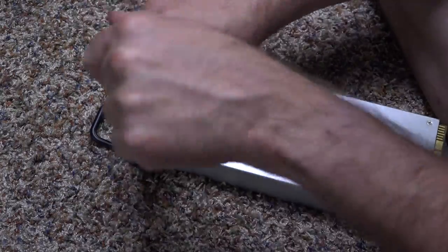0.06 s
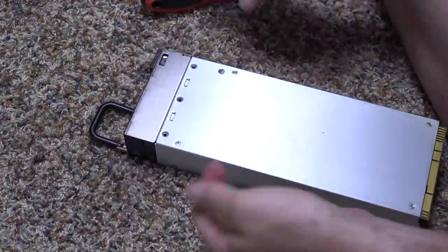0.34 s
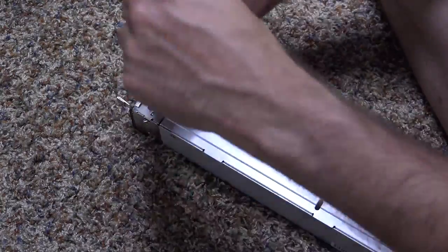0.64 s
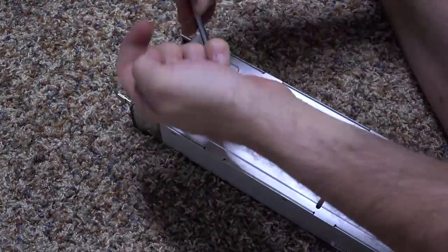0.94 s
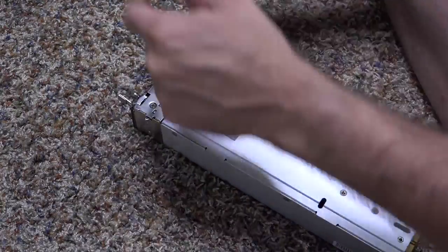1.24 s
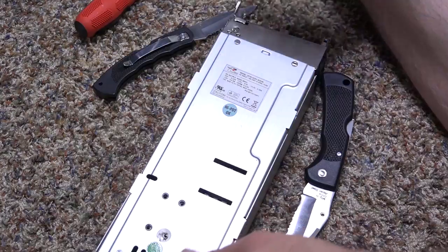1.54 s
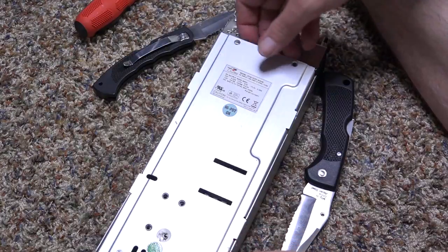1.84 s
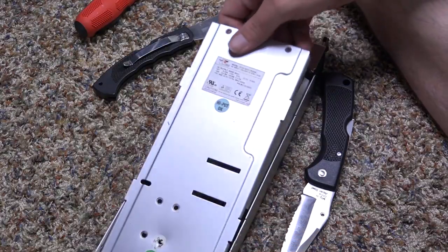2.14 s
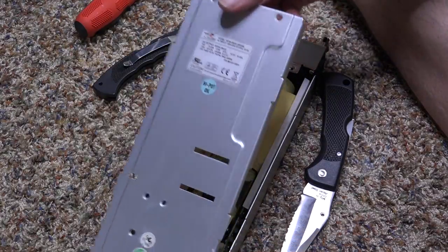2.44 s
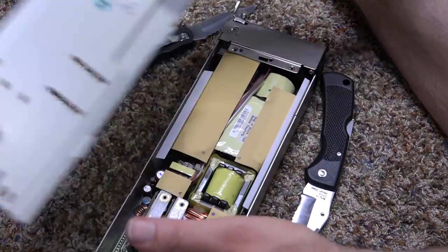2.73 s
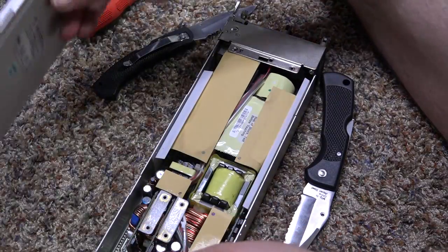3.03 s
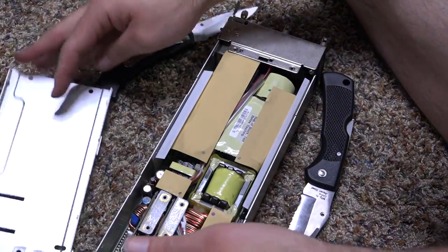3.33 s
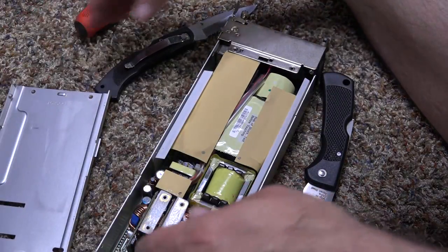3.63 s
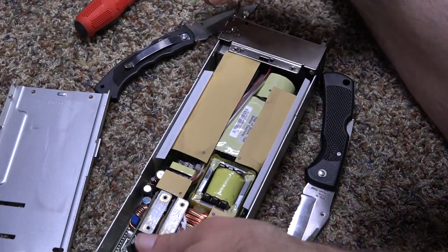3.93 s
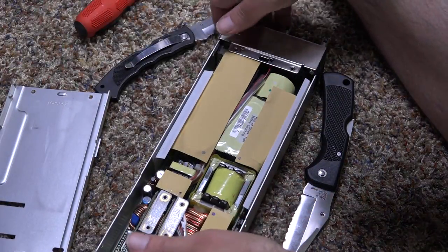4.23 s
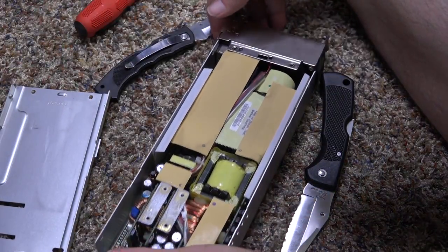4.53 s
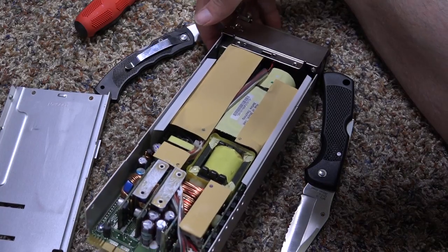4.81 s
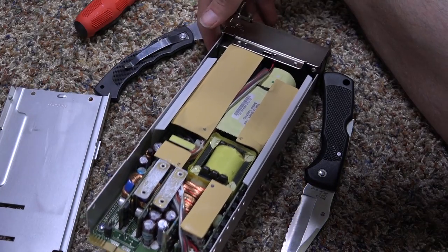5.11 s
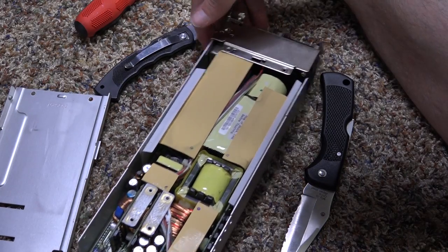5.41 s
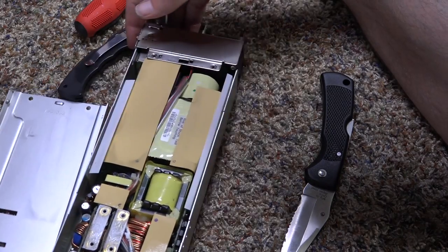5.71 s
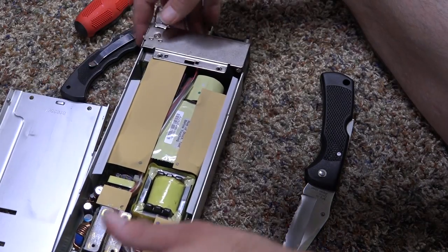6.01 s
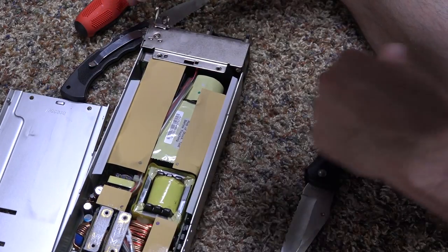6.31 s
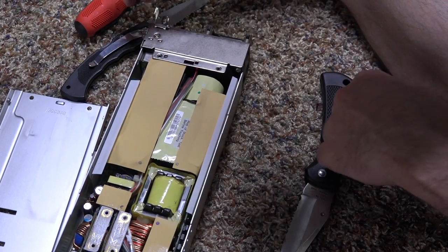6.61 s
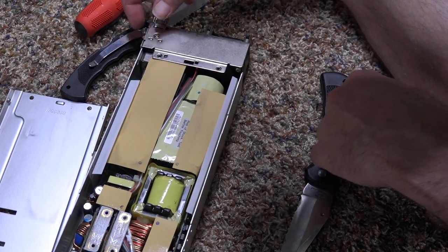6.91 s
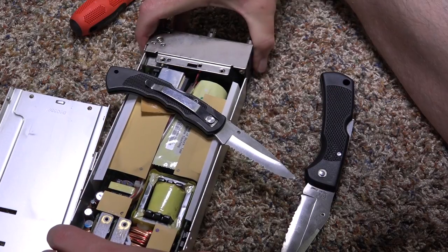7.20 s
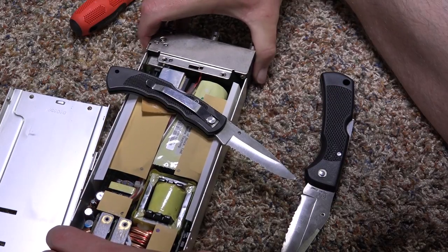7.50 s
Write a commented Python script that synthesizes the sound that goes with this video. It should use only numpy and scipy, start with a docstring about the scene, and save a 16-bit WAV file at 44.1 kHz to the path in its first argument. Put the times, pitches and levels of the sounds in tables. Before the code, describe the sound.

For the first 1.5 seconds, sped-up screwdriver work makes sharp, high, irregular ticks and tiny scratches over a faint beating whistle and hiss. This cuts abruptly to a soft, low room hum that lasts to the end. From about 2 to 2.5 seconds, a sheet-metal cover scrapes off its case, catching with short squeaks and faint tings. After a soft carpet scuff, the cover lands at 3.4 seconds with a loud, bright clatter, buzzing briefly on its edge and ringing out. Light clicks and knocks of handling come around 3.9 to 4.1 seconds and again at 5.1. From 5.5 to about 6.1 seconds the case brushes softly over carpet, bumping the cover into a quieter ringing rattle near 5.7. Two small clicks sound near 6.9 seconds, then dull knocks at 7 and 7.5. Everything is close and fairly dry, in a quiet room.

```python
"""Opening a small metal case

On a carpet in a quiet, humming room, the first second and a half runs at ten times the speed:
the hum is a beating whistle, the screwdriver mere ticks. Then, at normal speed, the sheet-metal
cover scrapes off in squeaking stick-slip and clatters down, ringing. The case is pushed across
the carpet against it, and nudged tools click and knock."""
import sys
import numpy as np
from scipy import signal
from scipy.fft import rfft, irfft
from scipy.io import wavfile
from scipy.ndimage import uniform_filter1d

SR = 44100
rng = np.random.default_rng(int(sys.argv[2]) if len(sys.argv) > 2 else 0)


def bounce(signal):
    """Save signal as a 16-bit WAV file at the path given by the first command-line argument."""
    frames = np.transpose(np.atleast_2d(signal))
    limited = np.clip(frames, -1, 1)
    pcm = np.round(limited * 32767).astype(np.int16)
    wavfile.write(sys.argv[1], SR, pcm)


N = 333043
T = np.arange(N) / SR


def amp(db):
    """Decibels to gain."""
    return 10 ** (np.asarray(db) / 20)


def unit_rms(x):
    """Scales to rms 1."""
    return x / np.sqrt(np.mean(x ** 2) + 1e-20)


def curve_at(points, hz):
    """Reads a curve on a log-frequency axis."""
    freqs, values = np.transpose(points)
    return np.interp(np.log(hz + 1), np.log(freqs), values)


def add(mix, start_s, sound):
    """Mixes a sound in at start_s."""
    part = mix[round(start_s * SR):][:len(sound)]
    part += sound[:len(part)]


def held(start_s, end_s, rise_s, fall_s):
    """Attack, hold, release: 20 dB down at rise_s before the start and fall_s after the end."""
    return amp(-20 * (np.maximum(start_s - T, 0) / rise_s + np.maximum(T - end_s, 0) / fall_s))


def swell(peak_s, half_s):
    """A bell-shaped rise and fall around peak_s."""
    return np.exp(-np.minimum(((T - peak_s) / half_s) ** 2, 20))


def coloured(x, colour):
    """Shapes x with an EQ curve of (freq_hz, gain_db) points, at rms 1."""
    gain = amp(curve_at(colour, np.fft.rfftfreq(len(x), 1 / SR)))
    return unit_rms(irfft(rfft(x) * gain, len(x)))


def burst(colour, t60, ring_hz=1000, ring_db=0, octaves=.2, size=8192):
    """A contact sets many damped modes going; the cluster at ring_hz stands out by ring_db."""
    hz, t = np.fft.rfftfreq(size, 1 / SR), np.arange(size) / SR
    shape_db = curve_at(colour, hz) + ring_db * np.exp(-(np.log2((hz + 1) / ring_hz) / octaves) ** 2)
    noise = irfft(amp(shape_db) * np.exp(2j * np.pi * rng.random(len(hz))))
    fade = amp(-60 * t / t60) * (1 - np.exp(-t / 0.0002))
    return unit_rms(noise * fade) * np.sqrt(np.mean(fade ** 2))


def ring(modes, tilt_db=0, spread_db=2.5, damping=1):
    """Struck modes die away from about rms 1; each strike point weights them anew."""
    hz, db, t60 = np.transpose(modes)[:, :, None]
    t = np.arange(SR // 2) / SR
    weight = amp(db + tilt_db * np.log2(hz / 4000) + spread_db * rng.standard_normal(hz.shape))
    waves = np.sin(2 * np.pi * (hz * t + rng.random(hz.shape))) * amp(-60 * t * damping / t60)
    attack = 1 - np.exp(-t / .0004)
    return (weight * waves).sum(0) / np.sqrt(np.sum(weight ** 2) / 2) * attack


def resonate(drive, modes):
    """Lets a steady drive ring a set of modes, at rms 1."""
    return unit_rms(signal.oaconvolve(drive, ring(modes))[:N])


def slips(per_s, spread_db):
    """Tiny stick-slip impacts at random times; spread_db makes their sizes uneven."""
    size = amp(spread_db * np.minimum(rng.exponential(1, N), 4))
    return size * rng.choice([-1, 1], N) * (rng.random(N) < per_s / SR)


def air_and_hum(air, hum, air_db):
    """A steady bed of air noise with humming sine tones."""
    tones = sum(amp(db) * np.sqrt(2) * np.sin(2 * np.pi * (hz * T + rng.random())) for hz, db in hum)
    return amp(air_db) * coloured(rng.standard_normal(N), air) + tones


def room_tone():
    """Soft air, mains hum and a motor turning just below the mains pitch."""
    air = [(25, -15.5), (60, -4.5), (115, -2), (190, -10), (255, -5.5), (400, -13.5), (600, -13.5),
           (1000, -18), (1800, -24.5), (3200, -33), (6000, -35.5), (15500, -37)]  # colour of the room air: freq_hz, gain_db
    hum = [(117.9, -66), (120, -68), (234.3, -76), (258.3, -73), (479.1, -66)]  # mains and motor tones: pitch_hz, level_db
    return air_and_hum(air, hum, air_db=-56)


def fast_room_tone():
    """At ten times the speed, mains and motor beat together as a whistle."""
    air = [(80, -71), (150, -34.5), (200, -32), (300, -22), (360, -12), (470, -18), (750, -9.5),
           (1000, -15), (1350, -12.5), (1800, -18), (4800, -20.5), (8000, -24), (15500, -31.5)]  # colour of the sped-up air: freq_hz, gain_db
    hum = [(1179, -56), (1200, -58), (2342, -69.5), (2584, -73), (4791, -65.5), (7413, -77), (12274, -77)]  # sped-up hum with the motor's high partials: pitch_hz, level_db
    return air_and_hum(air, hum, air_db=-56.5)


def room_reverb(x):
    """A short, carpeted tail of sparse reflections."""
    decay = [(150, 0.4), (1000, 0.17), (5000, 0.13), (15000, 0.092)]  # the room's decay: freq_hz, t60_s
    size = SR // 2
    reflections = rng.choice([-1., 1.], size) * (rng.random(size) < .07) * (T[:size] > .005)
    hz, t, spectra = signal.stft(reflections, SR, nperseg=256)
    fade = amp(-60 * t / curve_at(decay, hz)[:, None])
    tail = signal.istft(spectra * fade, SR, nperseg=256)[1]
    return signal.oaconvolve(x, tail / np.linalg.norm(tail))[:N]


def carpet_rub():
    """Carpet fibres slip under the metal in one long push and a few scuffs."""
    colour = [(150, 2), (500, 1.5), (1000, -2.5), (2500, -14.5), (6000, -9), (9000, -15), (15000, -10.5)]  # metal on carpet: freq_hz, gain_db
    scuffs = [(3.264, .028, -51), (3.33, .07, -58.5), (5.94, .03, -56.5), (6.017, 0.047, -60),
              (6.109, 0.029, -55), (7.2, 0.045, -62)]  # scuffs of cover and case: peak_s, half_length_s, level_db
    push = amp(-56) * held(5.52, 5.83, rise_s=0.13, fall_s=0.43)
    power = push ** 2 + sum((amp(db) * swell(peak_s, half_s)) ** 2 for peak_s, half_s, db in scuffs)
    return np.sqrt(power) * coloured(slips(per_s=4200, spread_db=2.5), colour)


def handling():
    """Small clicks and dull knocks on the case; the longer the click, the longer the steel rings."""
    # touches and bumps: start_s, click_db, click_hz, click_t60_s, knock_db
    touches = [(3.8746, -40, 10600, 0.03, -56), (3.884, -47, 5950, 0.034, -70),
               (3.9554, -55.5, 6000, 0.032, -57.5), (3.9744, -57, 5040, 0.034, -52),
               (4.0933, -38, 6700, 0.04, -44.5), (4.733, -55.5, 5950, 0.059, -68.5),
               (5.122, -41.5, 5000, 0.078, -43), (5.653, -49, 1755, 0.19, -44),
               (6.8718, -34, 11500, 0.029, -68), (6.885, -38, 5400, 0.023, -57),
               (7.0478, -41.5, 3000, 0.032, -34.5), (7.4979, -41.5, 3730, 0.018, -38.5)]
    knock = [(120, -23), (340, 2.5), (520, -6.5), (860, 2.5), (1200, -17), (2000, -9), (3500, -18),
             (8000, -48.5)]  # the case's dull knock: freq_hz, gain_db
    case_modes = [(3095, 2, 0.079), (3960, -3, 0.084), (4600, -13, 0.1), (5940, -9, 0.11),
                  (7450, -14, 0.13), (8958, -21, 0.19), (10120, -15, 0.15)]  # the steel case's ring: pitch_hz, weight_db, base_t60_s
    out = np.zeros(N)
    for start_s, click_db, hz, t60, knock_db in touches:
        # each click is strongest around its own pitch
        click = [(400, -18), (1500, -6), (hz, 0), (hz * 1.6, -4), (hz * 3, -17)]
        add(out, start_s, amp(click_db) * burst(click, t60, ring_hz=hz, ring_db=7.5, octaves=0.093))
        add(out, start_s, amp(knock_db) * burst(knock, t60=0.05))
        add(out, start_s, amp(min(click_db, knock_db) - 12) * ring(case_modes, damping=0.061 / t60))
    return out


def fast_screwdriver():
    """Unscrewing at high speed: every clink shrinks to a high tick with no bass."""
    ticks = [(0.0223, -18, 5560), (0.0281, -14.5, 5200), (0.034, -31, 5760), (0.0894, -19, 5300),
             (0.217, -32, 7000), (0.267, -31, 6470), (0.305, -33, 6500), (.312, -33.5, 9500),
             (.469, -27.5, 3830), (.6638, -21, 5750), (.6823, -29, 4100), (0.6896, -28, 4150),
             (0.96, -21.5, 7200), (0.965, -30.5, 5960), (1.036, -20, 12300), (1.322, -32, 5600),
             (1.3335, -29, 11400)]  # clinks of screwdriver and screws: start_s, level_db, ring_hz
    scratches = [(.274, -43), (.479, -37), (.835, -47), (.876, -44), (1.2835, -41)]  # the blade scratching in the screw heads: start_s, level_db
    colour = [(1000, -41), (2200, -22), (3400, -3.5), (7000, -0.5), (15500, -6)]
    out, tick_t60_s = np.zeros(N), 0.0072
    for start_s, db, hz in ticks:
        add(out, start_s, amp(db) * burst(colour, tick_t60_s, ring_hz=hz, ring_db=9, octaves=0.22))
        add(out, start_s, amp(db - 26) * burst(colour, t60=0.027))  # the room's tail, shrunk as well
    for start_s, db in scratches:
        add(out, start_s, amp(db) * burst(colour, t60=0.034, ring_hz=6600, ring_db=6, octaves=0.3))
    faint_ticks = signal.oaconvolve(slips(per_s=30, spread_db=4), burst(colour, tick_t60_s))[:N]
    out += amp(-67.5) * unit_rms(faint_ticks)
    return signal.sosfilt(signal.butter(2, 1200, "high", fs=SR, output="sos"), out)


def sheet_modes(t60, count=320):
    """The crowd of close modes of a thin sheet; the high ones die sooner."""
    shimmer = [(1400, -1.5), (2500, -10), (5000, 2), (7000, 2), (9000, -3.5), (12000, 6.5), (15500, -6.5)]  # colour of the cover's weaker modes: freq_hz, gain_db
    hz = 1400 + 14400 * (np.arange(count) + rng.random(count)) / count
    decay_s = t60 * (hz / 4000) ** -.25 * rng.uniform(.6, 1.4, count)
    return np.c_[hz, curve_at(shimmer, hz), decay_s]


def edge_tings():
    """Single high modes ring out as the cover's edge slips free."""
    tings = [(2.335, 5950, -50), (2.42, 6880, -37), (2.495, 2950, -49.5), (2.497, 7480, -54)]  # the freed edge singing: start_s, pitch_hz, level_db
    rise_s, t60_s = 0.0051, .11
    out, t = np.zeros(N), T[:SR // 2]
    envelope = (1 - np.exp(-t / rise_s)) * amp(-60 * t / t60_s)
    for start_s, hz, db in tings:
        add(out, start_s, amp(db) * envelope * np.sqrt(2) * np.sin(2 * np.pi * hz * t))
    return out


def squeak(hz):
    """A wavering stick-slip tone with a softer octave."""
    waver_hz = 45 * unit_rms(uniform_filter1d(rng.standard_normal(N), size=100))
    phase = 2 * np.pi * np.cumsum(hz + waver_hz) / SR
    return np.sqrt(2) * (np.sin(phase) + amp(-14) * np.sin(2 * phase))


def cover_slide():
    """Metal drags on metal: six contact points ring their own modes; the edge catches and squeaks."""
    grit_colour = [(710, -41), (1200, -19), (1800, -16), (2050, -12.5), (3690, -3), (4430, -26),
                   (4880, -13), (5610, -14), (6800, -2), (7480, -4.5), (15500, -2.5)]  # grit between cover and case: freq_hz, gain_db
    rumble_colour = [(300, -14), (600, -1), (900, -2), (1150, -3.5), (1700, -6), (2400, -19.5)]  # the case rumbling under the cover: freq_hz, gain_db
    # the edge catching: peak_s, half_length_s, scrape_db, squeak_hz, squeak_db
    catches = [(2.025, 0.0056, -63, 790, -51.5), (2.063, 0.024, -59, 905, -52),
               (2.086, 0.0086, -43.5, 935, -38), (2.155, .023, -46.5, 555, -50),
               (2.328, 0.025, -46, 639, -52), (2.392, .003, -42.5, 1800, -62),
               (2.416, 0.017, -40, 926, -48), (2.444, 0.033, -38, 1390, -59),
               (2.502, .012, -43, 657, -50.5)]
    contact_colour = [(500, -20), (2000, -8), (3500, -1.5), (7000, 2.5), (12000, -2.5), (15500, 6.5)]
    contacts = sum(resonate(slips(per_s=90, spread_db=2.5), sheet_modes(t60=.05, count=40))
                   for _ in range(6))
    grit = coloured(slips(per_s=2100, spread_db=3.0), grit_colour)
    scrape = unit_rms(coloured(contacts, contact_colour) + amp(2.5) * grit)

    # the drag scrapes harder and rumbles less as it goes
    start_s, end_s = 2.085, 2.51
    drag = held(start_s, end_s, rise_s=0.056, fall_s=0.029)
    dragged_s = np.clip(T, start_s, end_s) - start_s
    scrape_gain = drag * amp(-56.5 + 21 * dragged_s)
    rumble_gain = drag * amp(-55 - 12 * dragged_s)
    squeaks = np.zeros(N)
    for peak_s, half_s, scrape_db, hz, squeak_db in catches:
        grip = swell(peak_s, half_s)
        scrape_gain = np.hypot(scrape_gain, amp(scrape_db) * grip)
        rumble_gain = np.hypot(rumble_gain, amp(squeak_db - 6.5) * grip)
        squeaks += amp(squeak_db) * grip ** 2 * squeak(hz)  # only where the grip is hardest
    rumble = coloured(slips(per_s=980, spread_db=1), rumble_colour)
    return scrape_gain * scrape + rumble_gain * rumble + squeaks


def cover_clatter():
    """Each blow rings the sheet, clashes the edge and flexes the panel."""
    cover_modes = [(694, -3, .55), (958, -14, .4), (1071, -1.5, .4), (1443, -5, .22), (1868, -11, .35),
                   (2083, -2, .42), (2333, -4, .3), (2902, -6, .35), (2995, -6, .4), (3160, -7, .3),
                   (3289, -9, .3), (3634, -6, .35), (3964, -3, .35), (4160, -1, .33), (4608, -1, .3),
                   (4774, 2, .3), (4891, 0, .33), (5270, -4, .3), (5370, 1, .35), (5535, -2, .33),
                   (5653, -3, .3), (6164, -3, .27), (6476, -5, .25), (6851, 2, .18), (6925, -2, .28),
                   (7706, -3, .26), (9270, -7, .28), (10218, 0, .28), (10880, -5, .28), (11990, -5, .25)]  # the cover's ring: pitch_hz, weight_db, base_t60_s
    panel_modes = [(285, -22.5, 0.97), (467.7, -14.5, 0.92), (591, 1, 0.93), (619, -5.5, 0.58),
                   (665, -3, 0.56), (1008, -7.5, 0.47)]  # the whole panel flexing: pitch_hz, weight_db, share_of_t60
    # blows on the cover: start_s, ring_db, clash_db, panel_db, panel_t60_s, tilt_db_per_octave
    blows = [(3.3875, -24, -17.5, -23.5, 0.12, -0.5), (3.3975, -32.5, -27, -42, .1, -2),
             (3.4518, -29, -21, -41, 0.18, 0.5), (3.5185, -36, -26.5, -44.5, 0.3, -1.5),
             (3.5275, -40, -26.5, -59, .2, -1), (5.652, -46, -46, -35, 0.45, -4),
             (5.6865, -46.5, -31.5, -50, .2, 0), (5.718, -43, -38, -41.5, 0.2, -1.5),
             (5.748, -52.5, -40, -48.5, 0.29, -3.5)]
    out, clash_modes = np.zeros(N), sheet_modes(t60=0.087)
    for start_s, ring_db, clash_db, panel_db, panel_t60, tilt_db in blows:
        add(out, start_s, amp(ring_db) * ring(cover_modes, tilt_db, damping=1.4))
        add(out, start_s, amp(clash_db) * ring(clash_modes, tilt_db, spread_db=3.5))
        add(out, start_s, amp(panel_db) * ring(panel_modes, damping=1 / panel_t60))

    # the dropped cover buzzes on its edge until it tips over
    buzz_colour = [(200, -20), (450, -8), (620, 4), (850, -18.5), (1050, -3), (1230, -23), (1600, -4),
                   (3000, -3.5), (4800, 1.5), (7000, 4.5), (9500, -11), (12000, -13.5), (15500, -19)]  # the buzzing edge: freq_hz, gain_db
    impacts = slips(per_s=2100, spread_db=0)
    buzz = coloured(impacts, buzz_colour) + amp(-2.5) * resonate(impacts, cover_modes)
    on_edge = held(3.412, 3.452, rise_s=.014, fall_s=.026)
    return out + amp(-28) * on_edge * unit_rms(buzz)


def scene():
    """The sped-up unscrewing cuts straight to normal speed."""
    cut_s = 1.497
    foley = cover_clatter() + cover_slide() + edge_tings() + carpet_rub() + handling()
    normal = foley + amp(-12) * room_reverb(foley) + room_tone()
    fast = fast_screwdriver() + fast_room_tone()
    return np.where(T < cut_s, fast, normal)[None]


def record(dry):
    """A steep low-pass takes off the very top."""
    cutoff_hz = 15900
    lowpass = signal.firwin(301, cutoff_hz, window=("kaiser", 8), fs=SR)
    return signal.oaconvolve(dry, lowpass[None], "same")


dry = scene()
out = record(dry)
bounce(out)
```